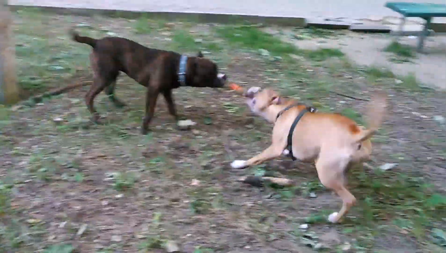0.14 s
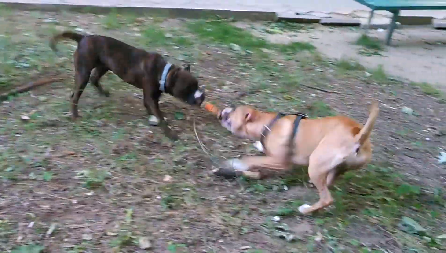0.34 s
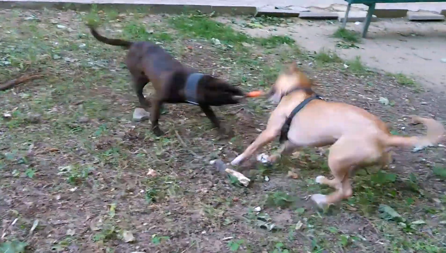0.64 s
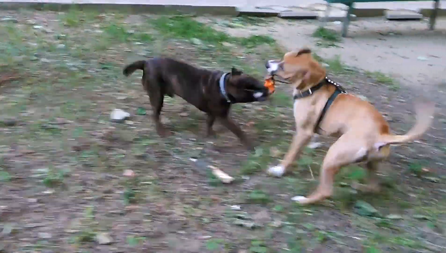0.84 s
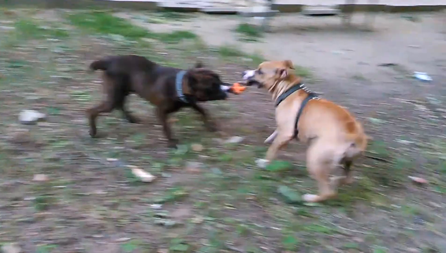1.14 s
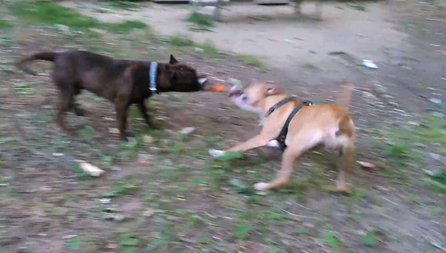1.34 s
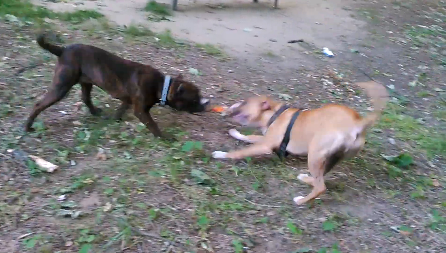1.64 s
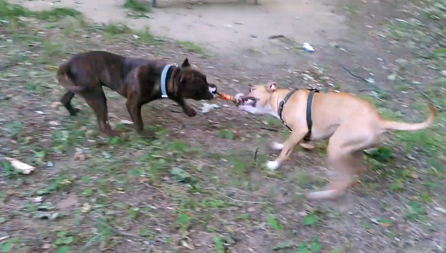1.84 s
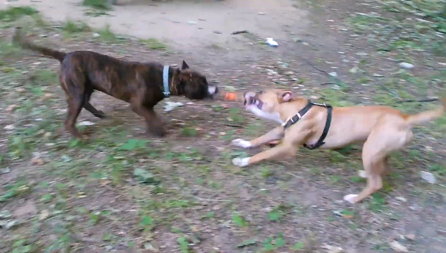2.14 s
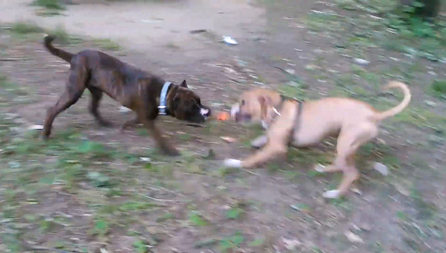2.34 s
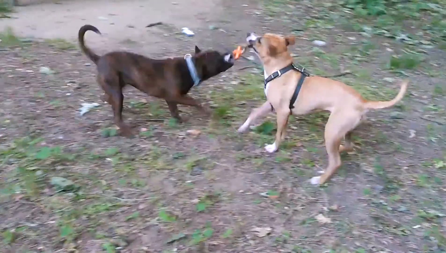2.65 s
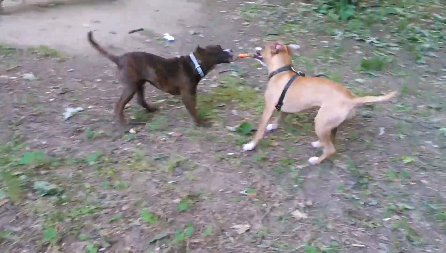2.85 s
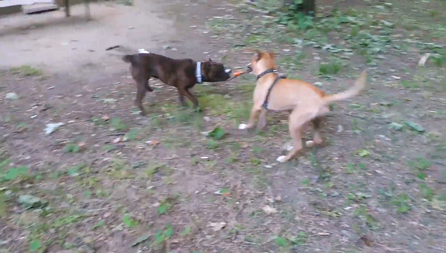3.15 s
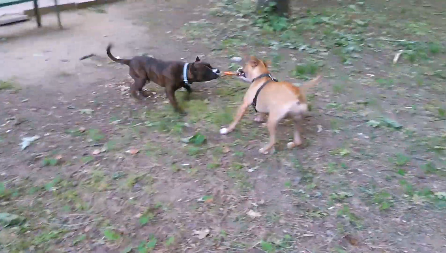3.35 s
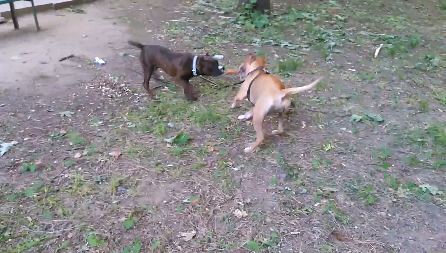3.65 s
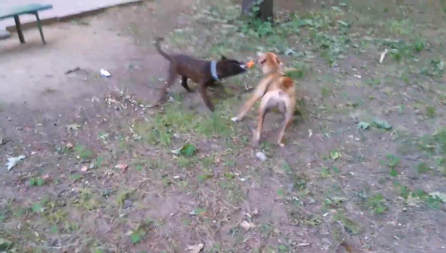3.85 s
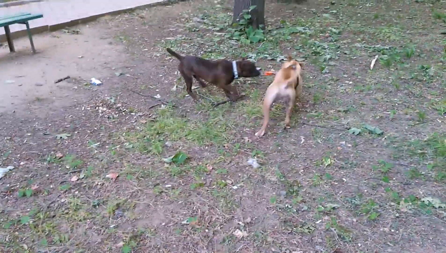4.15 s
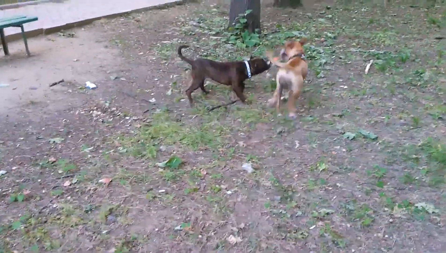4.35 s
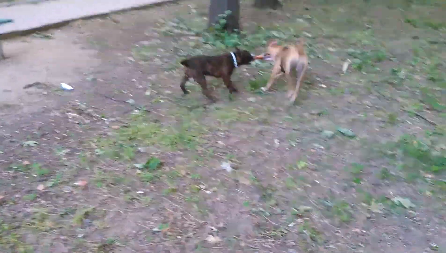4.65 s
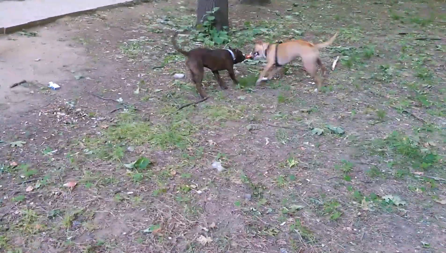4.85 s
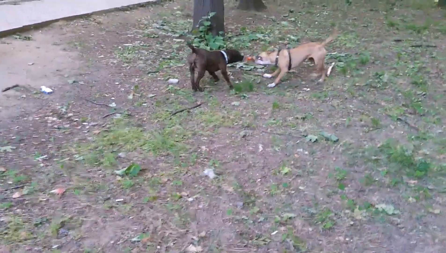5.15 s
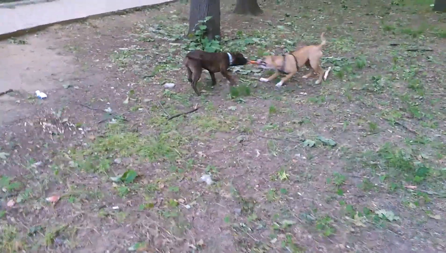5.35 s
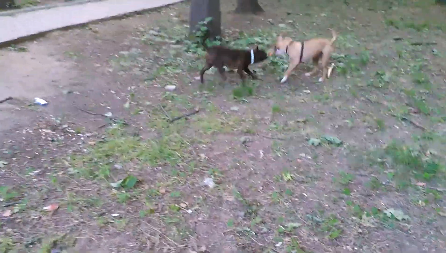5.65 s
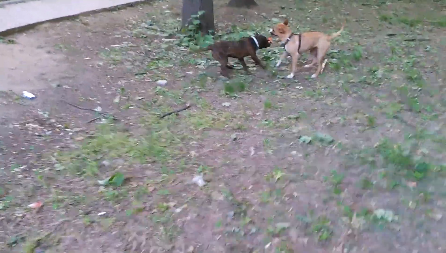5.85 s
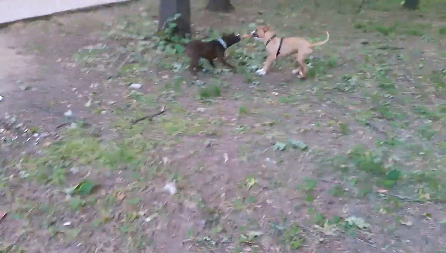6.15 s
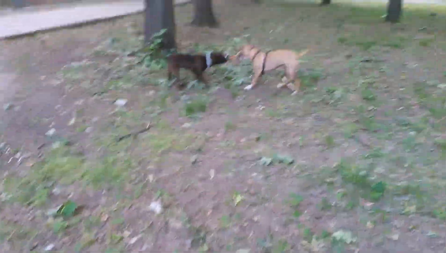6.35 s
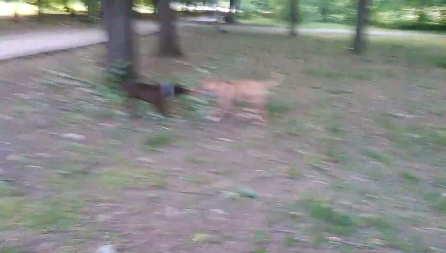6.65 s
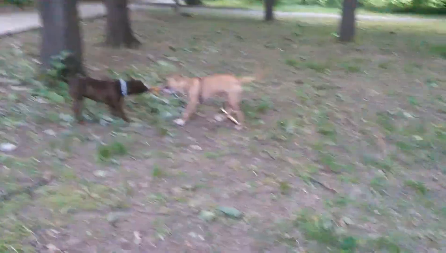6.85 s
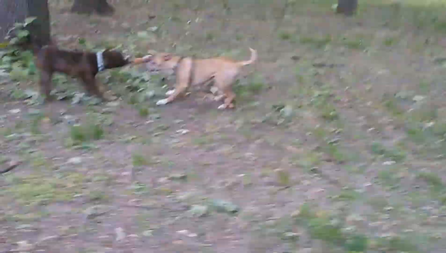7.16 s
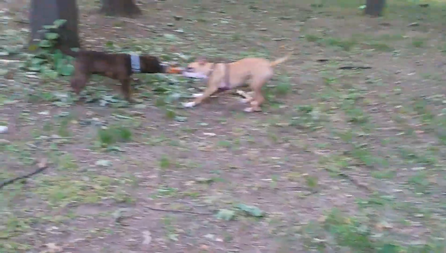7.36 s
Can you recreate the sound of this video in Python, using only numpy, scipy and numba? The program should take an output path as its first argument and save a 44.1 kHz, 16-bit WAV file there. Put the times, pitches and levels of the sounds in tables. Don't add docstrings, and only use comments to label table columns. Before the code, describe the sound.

In an open yard with a low, distant town hum, paws immediately scuff dry leaves and grit, crisp and bright, close to a phone microphone. A rough, chesty dog growl bursts in until 0.9 s, with small tag clicks, followed by a short grunt. A harder, snapping snarl runs from 1.2 to 2.0 s, then a long strained one from 2.2 to 3.2 s, amid leaf cracks and dull paw thuds. Another forceful growl at 3.4-4.1 s ends in a sudden loud grunt. Falling bird chirps appear from 4.1 to 5.1 s, while a long growl grinds from 4.7 to 5.7 s. A rapid bird trill at 5.2 s precedes a thin rising squeal near 5.6 s. A soft throbbing closed-jaw growl lies underneath until 7.1 s. A fading growl around 6.2 s leads to a swooping squeal at 6.4 s with slight echo, faint trills, and final grunts at 7.2-7.4 s.

```python
import sys
import numpy as np
from scipy import signal
from scipy.fft import rfft, irfft
from scipy.io import wavfile
from scipy.ndimage import uniform_filter1d
from numba import njit

SR = 44100
rng = np.random.default_rng(int(sys.argv[2]) if len(sys.argv) > 2 else 0)


def level_to_linear(level):
    exponent = np.asarray(level, float) / 20
    return 10 ** exponent


def log_audio(samples):
    frames = np.atleast_2d(samples).T
    limited = np.clip(frames, -1, 1)
    pcm = np.round(limited * 32767).astype(np.int16)
    wavfile.write(sys.argv[1], SR, pcm)


N = 330750

# [f/Hz, level/dB per Hz]
TOWN_HUM = [(32, -30), (55, 0.5), (120, 3), (350, -15), (665, -5.5), (5120, -15.5), (12300, -28),
            (14900, -25)]
HUM_DB = -38.5
WHINE_HZ, WHINE_DB = 14359, -46

# [t/s, length/s, level/dB]
PAW_DRAGS = [(0, 0.059, -20.5), (0.09, 0.71, -24), (0.82, 0.38, -21), (1.218, 0.78, -26),
             (1.693, 0.17, -24.5), (2.003, 0.75, -28.5), (2.873, 0.13, -27), (3.012, 0.3, -20.5),
             (3.365, 0.48, -22.5), (3.82, .17, -25), (4.04, 0.39, -25.5), (4.49, 0.56, -29.5),
             (4.685, 0.091, -24), (5.057, 0.045, -17.5), (5.098, 0.76, -24), (5.74, 0.087, -17),
             (5.86, .1, -35), (5.971, 0.069, -17), (6.027, 0.42, -24.5), (6.167, 0.067, -18.5),
             (6.263, 0.15, -19.5), (6.43, 0.24, -32.5), (6.556, 0.12, -28), (7.135, 0.29, -25),
             (7.206, 0.065, -20.5), (7.49, .03, -17.5)]
# [t/s, level/dB, half width/s]
PAW_DIGS = [(0.207, -11, 0.012), (.255, -17, .01), (.86, -10, 0.011), (.965, -11.5, 0.015),
            (1.1, -18, 0.039), (1.178, -17, 0.022), (1.36, -21, 0.013), (1.521, -19.5, 0.026),
            (1.845, -18, 0.019), (2.05, -16.5, 0.0099), (2.093, -22.5, 0.021), (2.3, -21.5, 0.022),
            (2.468, -16, 0.017), (2.61, -23.5, 0.011), (2.685, -21.5, 0.02), (2.82, -27.5, 0.027),
            (3.195, -21, 0.017), (3.285, -18, 0.01), (3.43, -13.5, 0.027), (3.534, -16, 0.036),
            (3.835, -18.5, 0.047), (4.135, -19.5, 0.018), (4.454, -12.5, 0.019), (4.94, -20, 0.024),
            (5.195, -18, 0.0087), (5.5, -15.5, 0.014), (5.656, -12.5, 0.021), (5.775, -14, 0.012),
            (6.3, -15.5, 0.016), (6.635, -18.5, 0.037)]
# [t/s, peak level/dB]
LEAF_CRACKS = [(0.0726, 0.5), (0.8578, -2), (0.9475, -1), (1.1375, 4), (1.2615, -4), (1.41, -6),
               (1.499, -8), (1.6944, -11), (1.729, -1.5), (1.8387, -16), (2.0385, -12), (2.169, -12),
               (2.365, -5), (3.1595, -3), (3.519, 3), (3.8165, -17), (4.121, -13), (4.315, -4), (4.67, -5),
               (5.1866, -11), (5.633, -17), (5.644, 0), (5.9768, -14), (6.139, -4)]
DRAG_EDGE_S, LEAVES_REST_DB = 0.057, -39

# [t/s, effort level/dB, throat f/Hz, jaw opening level/dB]
NEAR_GROWLS = [
    [(.02, -46, 760, 3), (.06, -27, 720, -5.5), (.234, -23.5, 760, -6), (.51, -29.5, 640, 4.5),
     (.6, -26.5, 774, -4.5), (.71, -30, 850, 3), (.852, -27.5, 670, -3), (.875, -50, 690, -1)],
    [(1.21, -29, 720, -13), (1.254, -20.5, 740, -16.5), (1.398, -20, 812, -12), (1.434, -18, 800, -13.5),
     (1.518, -34.5, 720, 6), (1.64, -21.5, 650, -8), (1.935, -29.5, 880, -5.5), (1.99, -46, 815, 9)],
    [(2.18, -18.5, 820, -9), (2.362, -24, 870, -5.5), (2.47, -19, 754, -30), (2.516, -27.5, 890, -9.5),
     (2.61, -22.5, 710, -4), (2.8, -19, 685, -16.5), (2.858, -30, 627, -2.5), (3.072, -19.5, 694, -9.5),
     (3.17, -34, 750, 0)],
]
# [t/s, effort level/dB, throat f/Hz, jaw opening level/dB]
LEAVING_GROWLS = [
    [(3.385, -26.5, 750, -19), (3.52, -16, 763, -34), (3.573, -25.5, 857, -23), (3.683, -23.5, 820, -2),
     (3.867, -22, 773, -1.5), (3.92, -19.5, 797, -6.5), (4.07, -24, 805, -6), (4.105, -32, 785, -6)],
    [(4.655, -40, 805, 2), (4.719, -30.5, 770, 3.5), (5.017, -24.5, 670, -5), (5.063, -20, 623, -11.5),
     (5.259, -24.5, 750, 0), (5.325, -22, 715, -3.5), (5.569, -23.5, 823, -8.5), (5.643, -21, 700, -8),
     (5.675, -46, 740, -10)],
    [(5.95, -34, 745, -7), (6.02, -24, 680, -9.5), (6.218, -26.5, 670, 0.5), (6.265, -24.5, 784, -7),
     (6.38, -31, 746, 2.5), (6.45, -37.5, 670, -5)],
]
# [t/s, effort level/dB, throat f/Hz, jaw opening level/dB]
SHORT_GRUNTS = [
    [(.93, -30.5, 695, -4), (.976, -30, 725, -10.5), (1.06, -46, 726, 11.5)],
    [(4.112, -23, 755, -6), (4.17, -18, 790, -11.5), (4.25, -37, 760, 0)],
    [(6.49, -40, 725, -9), (6.6, -31.5, 800, -7), (6.7, -36, 770, -3)],
    [(7.135, -42, 760, 2.5), (7.2, -28.5, 730, 1.5), (7.304, -30.5, 760, 6.5), (7.4, -26, 755, -2),
     (7.45, -45, 740, 4)],
    [(4.26, -47, 760, 4), (4.38, -44.5, 780, 6), (4.5, -47, 700, 3), (4.645, -52.5, 646, -2)],
]
CHEST_DEPTHS = [-31.5, -32, -35, -32.5, -27, -32, -54, -35, -28.5, -26, -31]
# [t/s, mouth f/Hz, teeth f/Hz]
JAW_POSTURE = [(0.0, 1180, 1660), (.4, 1170, 1670), (.56, 1210, 1830), (1.3, 1150, 1730),
               (1.42, 1200, 1870), (2.42, 1180, 1860), (2.64, 1350, 1710), (2.74, 1420, 1930),
               (2.86, 1450, 1600), (3.12, 1440, 2180), (3.43, 1110, 1840), (3.74, 1240, 1520),
               (4.34, 1250, 1790), (4.7, 1150, 1290), (5.16, 1280, 1920), (5.55, 1290, 1840),
               (6.08, 1270, 1630), (7.5, 1145, 1790)]
# [f/Hz, width/Hz, level/dB]
RASP_MODES = [(2390, 940, -12), (2980, 1900, -7.5), (3910, 410, -15.5)]
# [t/s, length/s, f/Hz, level/dB]
LIP_FLARES = [(0.093, 0.087, 2600, -38), (0.497, 0.096, 3070, -33), (0.505, 0.103, 1780, -31),
              (1.485, 0.05, 1900, -30), (1.47, .07, 1250, -29), (1.49, .05, 2300, -31),
              (.77, .05, 1400, -29), (2.53, .16, 1750, -33), (3.82, .09, 1330, -29),
              (1.255, .06, 1750, -33), (1.673, 0.075, 2840, -30.5), (2.5, 0.165, 1800, -34),
              (3.722, 0.069, 4200, -33.5), (3.95, 0.037, 1950, -24), (4.117, 0.11, 2620, -38),
              (4.316, 0.07, 3070, -37), (3.47, 0.064, 2200, -37), (.28, 0.154, 2500, -38),
              (1.34, .12, 1100, -26), (4.304, 0.14, 1350, -39), (2.624, 0.026, 2100, -31),
              (2.5, 0.055, 2100, -38), (1.336, 0.092, 1850, -34), (1.34, 0.048, 2100, -34),
              (4.67, 0.032, 1230, -27), (5.3, 0.018, 1300, -19), (4.75, .05, 1230, -29),
              (3.65, 0.15, 1370, -24.5), (6.345, 0.043, 1770, -26), (2.85, 0.069, 1460, -27),
              (2.945, 0.028, 1750, -28), (1.69, 0.052, 1780, -30), (2.3, 0.09, 2080, -32.5),
              (5.24, 0.066, 1700, -26), (5.492, 0.09, 1705, -24), (6.06, 0.095, 1530, -33.5),
              (6.17, .12, 1350, -29), (6.17, .14, 1860, -33), (0.148, 0.11, 1300, -27.5),
              (.28, 0.16, 1290, -27.5), (4.71, .085, 1500, -43), (4.3, .085, 3300, -36),
              (4.33, .07, 2240, -35), (5.45, .2, 2900, -34.5), (7.174, 0.1, 2310, -29.5),
              (7.344, 0.076, 1770, -23)]
# [t/s, peak level/dB, f/Hz]
FOLD_SNAPS = [(0.086, -14.5, 670), (0.241, -14, 780), (0.353, -12.5, 633), (0.438, -13, 1260),
              (0.776, -17, 870), (0.838, -17, 655), (1.216, -17, 666), (1.228, -10, 714), (1.3, -3.5, 694),
              (1.337, -9, 808), (1.398, -9, 800), (1.63, -14.5, 640), (1.652, -14.5, 693),
              (1.693, -9.5, 668), (1.854, -12, 757), (2.191, -8, 784), (2.201, -7, 757), (2.29, -9.5, 810),
              (2.39, -14, 794), (2.436, -4.5, 800), (2.733, -7, 790), (2.846, -14.5, 596),
              (2.91, -11.5, 586), (3.007, -17, 740), (3.053, -7.5, 720), (3.091, -17, 690),
              (3.386, -21, 760), (3.43, -15.5, 780), (3.449, -15.5, 830), (3.507, -5.5, 895),
              (3.596, -12.5, 875), (3.645, -14, 1110), (3.664, -9, 790), (3.769, -8, 840),
              (3.943, -10, 854), (3.97, -9.5, 753), (4.041, -12.5, 880), (4.125, -11.5, 725),
              (4.669, -19.5, 784), (4.725, -5.5, 800), (4.757, -6.5, 794), (4.783, -7, 750),
              (4.85, -9, 820), (4.876, -10.5, 574), (4.895, -9.5, 670), (4.946, -10.5, 644),
              (4.982, -13, 770), (5.024, -12, 563), (5.132, -12, 635), (5.225, -13, 780), (5.279, -11, 674),
              (5.298, -9.5, 804), (5.482, -12, 810), (5.624, -8.5, 690), (5.991, -13.5, 720),
              (6.113, -12, 736), (6.173, -15, 566), (6.268, -13, 628), (6.354, -15, 570),
              (7.394, -9.5, 785)]
# [t/s, peak level/dB, f/Hz]
FURTHER_SNAPS = [(.402, -15, 666), (.584, -11.5, 734), (1.262, -10, 695), (1.42, -10, 796),
                 (2.449, -7, 764), (2.466, -7, 850), (2.808, -28, 710), (3.521, -13, 806), (4.16, -13, 760),
                 (4.716, -15, 1120), (4.726, -17, 1240), (4.748, -12, 1140), (4.759, -22, 1300),
                 (4.778, -11, 1200), (4.788, -13, 1280), (3.598, -25, 1250), (7.2, -20, 784),
                 (7.26, -12, 1130), (5.053, -13, 600), (5.16, -10, 705), (5.25, -12.5, 770),
                 (.152, -11, 753), (.35, -12.5, 1250), (2.182, -13.5, 783), (2.219, -8, 780),
                 (2.253, -14, 780), (2.306, -12.5, 1000), (2.317, -12, 900), (7.394, -9.5, 1764)]
SNAP_TRIM_DB, SNAP_BLAST_DB = -1.5, -13
HUSH, HUSH_S = .45, .006
CHEST_PER_EFFORT, USUAL_EFFORT_DB, CHEST_REST_DB, CHEST_PURR_DB = 0.77, -20.5, -56.5, -47.5
PHARYNX_DB, PHARYNX_DB_PER_HZ, PHARYNX_PER_JAW, LOW_THROAT_HZ = -2.5, -0.0164, 0.78, 670
MOUTH_DB, MOUTH_PER_JAW, TEETH_DB, TEETH_PER_JAW = -2, 1.19, -6, 1

# [t/s, peak level/dB, f/Hz]
TAG_CLICKS = [(0.058, -17, 2470), (0.086, -11, 2550), (0.1, -14, 2600), (0.13, -16, 2660),
              (0.155, -16, 2600), (0.577, -11, 2800), (2.277, -13, 2340), (2.531, -21, 3600),
              (0.1957, -10, 2450), (1.7185, -12, 2600), (2.624, -17, 3700), (3.7763, -9, 3660),
              (4.354, -11.5, 2670), (4.721, -11, 5460), (4.7521, -14, 3300), (4.7885, -9, 3980),
              (4.8559, -13, 5240), (6.0856, -16, 2570)]
# [t/s, peak level/dB]
PAW_THUDS = [(0.78, -27.5), (1.287, -26), (3.015, -31), (3.418, -31), (4.323, -40), (4.518, -37),
             (5.44, -35), (5.91, -35), (6.191, -36), (6.358, -24.5)]
GROUND_HZ = 102.8

# [t/s, length/s, from f/Hz, to f/Hz, level/dB]
BIRD_CHIRPS = [
    (4.14, .07, 6300, 4300, -39),
    (4.35, .1, 6500, 3600, -36),
    (4.58, .082, 6500, 4200, -35),
    (4.815, .105, 6600, 3600, -29),
    (5.08, .05, 4300, 2900, -31),
    (7.015, .045, 3500, 2800, -39),
]
# [from t/s, to t/s, f/Hz, level/dB]
FAR_TRILLS = [
    (5.2, 5.6, 6300, -52),
    (5.31, 5.63, 4350, -50),
    (6.18, 6.8, 5050, -52),
    (6.97, 7.3, 4200, -50),
]
# [t/s, peak level/dB, f/Hz]
NEAR_TRILL = [(5.1898, -20, 6030), (5.2073, -18, 6330), (5.2517, -16, 6440), (5.2831, -16, 6020),
              (5.3126, -27, 6400), (5.329, -15, 6470), (5.3365, -15, 6160), (5.3709, -16.5, 6350),
              (5.4004, -35, 6100), (5.4004, -21, 6440), (5.4248, -33, 6300), (5.4468, -26, 6750),
              (5.4822, -24, 6200), (5.4912, -25, 6270), (5.5186, -22, 6400), (5.5366, -25, 6270),
              (5.5745, -20, 6250)]

# [t/s, f/Hz, level/dB]
RISING_SQUEAL = [(5.42, 2330, -46), (5.555, 2470, -29), (5.59, 2480, -14.5), (5.634, 2562, -15.5),
                 (5.67, 2656, -36), (5.702, 2706, -29), (5.765, 2680, -20), (5.84, 2720, -42),
                 (6.17, 2705, -49)]
# [t/s, f/Hz, level/dB]
SWOOPING_SQUEAL = [(6.345, 1800, -29), (6.372, 2080, -33), (6.392, 2300, -30), (6.425, 2405, -24),
                   (6.48, 2400, -35), (6.54, 2400, -32), (6.575, 2560, -36), (6.612, 2625, -31),
                   (6.9, 2610, -53)]

# [from t/s, to t/s, throb f/Hz, level/dB]
SOFT_PURR = (5.5, 7.15, 23, -39.5)
# [f/Hz, width/Hz, level/dB]
SHUT_JAW_MODES = [(520, 90, -9), (800, 80, -4), (1080, 150, -6), (1860, 170, -5)]

YARD_T60_S, YARD_DAMP = 1.1, 0.05
TOP_HZ = 15650


def level(x, db):
    return x * level_to_linear(db) / np.sqrt(np.mean(x ** 2))


def curves(table):
    s, *columns = np.transpose(table)
    return [np.interp(np.arange(N) / SR, s, c) for c in columns]


def walk(rate):
    hold = int(SR / rate)
    steps = np.repeat(rng.standard_normal(N // hold + 1), hold)
    return 1.4 * uniform_filter1d(uniform_filter1d(steps, hold), hold)[:N]


def steady(x, span_s=0.1):
    return x / np.sqrt(uniform_filter1d(x ** 2, int(span_s * SR)) + 1e-12)


def gate(from_s, to_s, edge_s):
    t = np.arange(N) / SR
    return uniform_filter1d(1. * (t > from_s) * (t < to_s), int(edge_s * SR))


@njit
def svf(x, hz, width):
    y, b, l = np.empty(len(x)), 0., 0.
    for i in range(len(x)):
        g, k = np.tan(np.pi * hz[i] / SR), width / hz[i]
        v = (b + g * (x[i] - l)) / (1 + g * (g + k))
        b, l, y[i] = 2 * v - b, l + 2 * g * v, k * v
    return y


def band(x, hz, width_hz, order=1):
    for _ in range(order):
        x = svf(x, hz + np.zeros(N), float(width_hz))
    return x


def rings(events, rise_s, overtone, order=1):
    out = np.zeros(N + SR)
    u = np.arange(int(10 * rise_s * SR)) / SR / rise_s
    swell = (u * np.exp(1 - u)) ** order
    for s, db, hz in events:
        turn = 2 * np.pi * hz * u * rise_s
        tone = np.sin(turn) + overtone * np.sin(1.527 * turn)
        out[int(s * SR):][:len(u)] += level_to_linear(db) * tone * swell
    return out[:N]


def hum():
    hz = np.fft.rfftfreq(N, 1 / SR) + 1
    table_hz, table_db = np.transpose(TOWN_HUM)
    colour = level_to_linear(np.interp(np.log(hz), np.log(table_hz), table_db))
    noise = level(irfft(rfft(rng.standard_normal(N)) * colour, N), HUM_DB)
    whine = level_to_linear(WHINE_DB) * np.sin(2 * np.pi * WHINE_HZ * np.arange(N) / SR)
    return noise * level_to_linear(1.5 * walk(3)) + whine


def paws():
    t = np.arange(N) / SR
    power = sum(gate(s, s + length, DRAG_EDGE_S) * level_to_linear(2 * db) for s, length, db in PAW_DRAGS)
    power = power + sum(level_to_linear(2 * db) * np.exp(-((t - s) / half_s) ** 2) for s, db, half_s in PAW_DIGS)
    return np.sqrt(np.abs(power) + level_to_linear(2 * LEAVES_REST_DB))


def scrape():
    grain_db = 2.16 * rng.exponential(1, N // 8 + 1).repeat(8)[:N]
    patch_db = 1.8 * walk(60) + 2.0 * walk(250)
    grains = rng.standard_normal(N) * level_to_linear(grain_db + patch_db)
    cracks = np.zeros(N)
    for s, peak_db in LEAF_CRACKS:
        cracks[int(s * SR)] = level_to_linear(peak_db - 3.5)
    cracks = signal.lfilter([1], [1, -np.exp(-1 / (.002 * SR))], cracks) * rng.standard_normal(N)
    bright = paws() * steady(grains, 0.093) + cracks
    crisp = 1.51 * band(bright, 14640, 4470) + 0.28 * band(bright, 12400, 12100, order=2)
    return crisp + 0.32 * band(bright, 6880, 15500) + 0.2 * band(bright, 1070, 2400)


@njit
def folds(hz, stretch, size):
    pulses, puffs, phase, k = np.zeros(len(hz)), np.empty(len(hz)), 0., 0
    for i in range(len(hz)):
        phase += hz[i] * stretch[k] / SR
        if phase >= 1:
            phase, k = phase - 1, k + 1
            pulses[i] = size[k]
        puffs[i] = size[k] * (1 - phase) ** 2
    return pulses, puffs


def larynx(hz):
    chance = rng.standard_normal((N // 100, 2)).T
    pulses, puffs = folds(hz * level_to_linear(.5 * walk(20)), level_to_linear(1.3 * chance[0]), level_to_linear(1.6 * chance[1]))
    flap = level_to_linear(1.2 * walk(32))
    air = flap * level((puffs + .4) * rng.standard_normal(N), 0)
    return flap * level(pulses, 0) + 1.15 * air, air


def chest_ring(voice, fold_hz):
    ribs = level(band(voice, fold_hz, 35, order=2), -5.0)
    ribs = ribs - level(band(voice, 181.7, 116, order=2), 0.34)
    return steady(ribs + level(band(voice, 356, 77), -8.5))


def snap_hush():
    t = np.arange(N) / SR
    return np.prod([1 - HUSH * np.exp(-((t - s) / HUSH_S) ** 2) for s, _, _ in FOLD_SNAPS], axis=0)


def growls():
    bursts = NEAR_GROWLS + LEAVING_GROWLS + SHORT_GRUNTS
    effort_db, throat_hz, jaw_db = curves(np.vstack(sorted(bursts, key=lambda burst: burst[0][0])))
    mouth_hz, teeth_hz = curves(JAW_POSTURE)
    gates = [gate(burst[0][0], burst[-1][0], .009) for burst in bursts]
    pharynx_db = PHARYNX_DB + PHARYNX_DB_PER_HZ * (throat_hz - LOW_THROAT_HZ) + PHARYNX_PER_JAW * jaw_db
    mouth_db = MOUTH_DB + MOUTH_PER_JAW * jaw_db
    teeth_db = TEETH_DB + TEETH_PER_JAW * jaw_db

    fold_hz = 105 * level_to_linear(.7 * walk(4))
    voice, air = larynx(fold_hz)
    breathy = .7 * voice + .9 * air
    throat = band(voice, throat_hz * (1 + .03 * walk(25)), 140, order=2)
    pharynx = band(voice, 540 * (1 + 0.048 * walk(10)), 146, order=2)
    mouth = band(voice, mouth_hz * (1 + .05 * walk(25)), 310, order=2)
    teeth = band(breathy, teeth_hz * (1 + 0.082 * walk(15)), 370, order=2)
    teeth = steady(teeth, 0.093) * level_to_linear(2.2 * walk(30))
    rasp = sum(level_to_linear(db + 2.5 * walk(25)) * level(band(breathy, hz, width, order=2), 0)
               for hz, width, db in RASP_MODES)
    front = teeth - rasp
    head = steady(throat, 0.024) - level_to_linear(pharynx_db) * steady(pharynx)
    head = head - level_to_linear(mouth_db) * steady(mouth, 0.051) + level_to_linear(teeth_db) * front
    flares = sum(gate(s, s + length, 0.012) * level(band(breathy + .5 * voice, hz, 240, order=2), db)
                 for s, length, hz, db in LIP_FLARES)

    depth = sum(g * level_to_linear(db) for g, db in zip(gates, CHEST_DEPTHS))
    depth = depth * level_to_linear(CHEST_PER_EFFORT * (effort_db - USUAL_EFFORT_DB)) + level_to_linear(CHEST_REST_DB)
    depth = depth + level_to_linear(CHEST_PURR_DB) * gate(SOFT_PURR[0], SOFT_PURR[1], .04)

    snaps = level_to_linear(SNAP_TRIM_DB) * rings(FOLD_SNAPS + FURTHER_SNAPS, .0046, .2, order=4)
    blast = uniform_filter1d(np.abs(snaps), SR // 250) * level_to_linear(SNAP_BLAST_DB) * (steady(mouth) + 0.39 * front)
    clumps = snap_hush() * level_to_linear(walk(45))
    voiced = clumps * (sum(gates) * level_to_linear(effort_db) * head + flares)
    return voiced + snaps + blast + depth * chest_ring(voice, fold_hz)


def clicks():
    return .5 * rings(TAG_CLICKS, .0012, .05)


def thuds():
    return rings([(s, db, GROUND_HZ) for s, db in PAW_THUDS], 0.021, 0.41)


def birds():
    song, waver = np.zeros(N), walk(300)
    for s, length, from_hz, to_hz, db in BIRD_CHIRPS:
        u = np.linspace(0, 1, int(length * SR))
        start = int(s * SR)
        hz = to_hz + (from_hz - to_hz) * np.clip(1 - 1.06 * u, 0, 1) + 90 * waver[start:][:len(u)]
        tone = np.sin(2 * np.pi * np.cumsum(hz) / SR)
        song[start:][:len(u)] += level_to_linear(db) * np.sin(np.pi * u) ** 0.18 * tone
    for from_s, to_s, hz, db in FAR_TRILLS:
        trill = band(rng.standard_normal(N), hz * (1 + .03 * walk(40)), 550, order=2)
        song += gate(from_s, to_s, .06) * level_to_linear(db - 2 + 6 * walk(90)) * steady(trill)
    ticks = level_to_linear(-3.0) * rings(NEAR_TRILL, 0.00083, 0)
    leaves = rng.standard_normal(SR // 4) * np.exp(-np.arange(SR // 4) / (.05 * SR))
    smear = signal.fftconvolve(song + .4 * ticks, leaves)[:N]
    return .6 * song + ticks + level_to_linear(-27) * smear


def squeal(table, octave_db):
    hz, db = curves(table)
    phase = 2 * np.pi * np.cumsum(hz * (1 + .007 * walk(110))) / SR
    tone = np.sin(phase) + level_to_linear(octave_db) * np.sin(2 * phase + 1.5 * walk(150))
    beating = level_to_linear(db + 3 + 2.5 * walk(40) + 2.5 * walk(130))
    return gate(table[0][0], table[-1][0], .03) * beating * tone


def purr():
    from_s, to_s, throb_hz, db = SOFT_PURR
    voice, _ = larynx(np.full(N, 104.))
    throb = 1 + .45 * np.sin(2 * np.pi * throb_hz * np.arange(N) / SR + 1.2 * walk(6))
    head = sum((-1) ** k * level_to_linear(mode_db) * level(band(voice, hz, width, order=2), 0)
               for k, (hz, width, mode_db) in enumerate(SHUT_JAW_MODES))
    return gate(from_s, to_s, 0.029) * throb * level_to_linear(db) * steady(head)


@njit
def walls(x, lags, gain, damp):
    line, soft, out = np.zeros((8, 8192)), np.zeros(8), np.zeros(len(x))
    for i in range(len(x)):
        total = 0.
        for k in range(8):
            soft[k] += (1 - damp) * (gain[k] * line[k, (i - lags[k]) & 8191] - soft[k])
            total += soft[k]
        for k in range(8):
            line[k, i & 8191] = x[i] + soft[k] - total / 4
        out[i] = soft[0] - soft[3] + soft[5] - soft[6]
    return out


def scene():
    ground = hum() + scrape() + thuds()
    near = growls() + clicks()
    chirps = birds()
    cries = squeal(RISING_SQUEAL, -32) + squeal(SWOOPING_SQUEAL, -24)
    lags = rng.integers(500, 3000, 8)
    feed = level_to_linear(-25) * near + level_to_linear(-18) * (cries + 2.2 * chirps)
    yard = walls(feed, lags, level_to_linear(-60 * lags / SR / YARD_T60_S), YARD_DAMP)
    return (ground + near + chirps + cries + purr() + yard)[None]


def band_limit(x):
    return signal.sosfilt(signal.butter(12, 16620, fs=SR, output="sos"), x)


def record(dry):
    x = dry[0] - .6 * band(dry[0], 355, 110)
    x = signal.sosfilt(signal.butter(2, 40, "high", fs=SR, output="sos"), x)
    x = np.tanh(.8 * x) / .8
    x = signal.sosfilt(signal.ellip(10, .2, 60, TOP_HZ, fs=SR, output="sos"), x)
    return band_limit(x[None])


dry = scene()
out = record(dry)
log_audio(out)
```